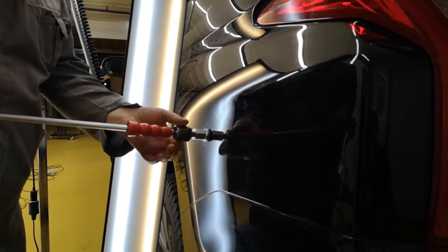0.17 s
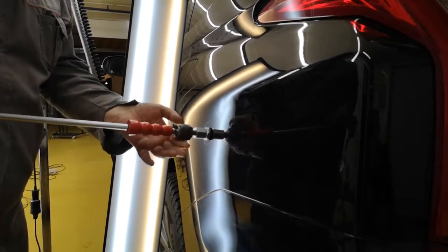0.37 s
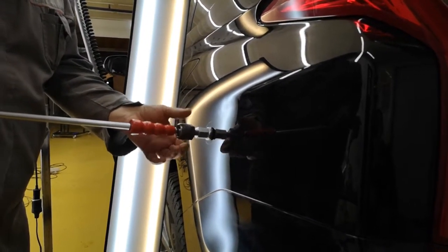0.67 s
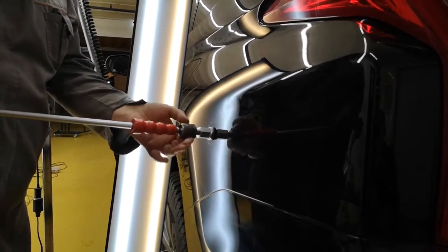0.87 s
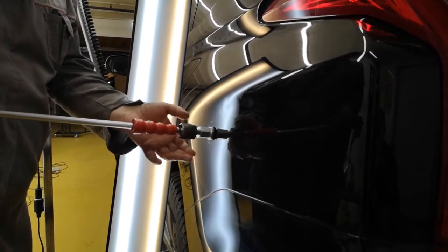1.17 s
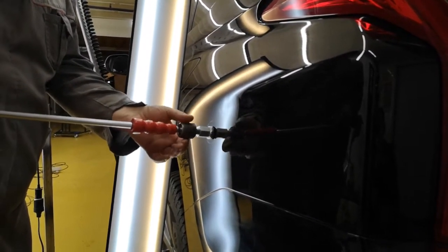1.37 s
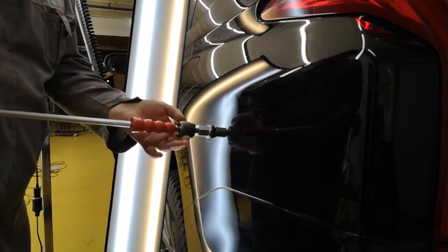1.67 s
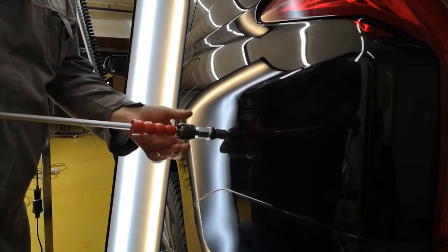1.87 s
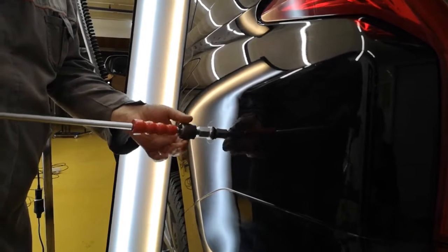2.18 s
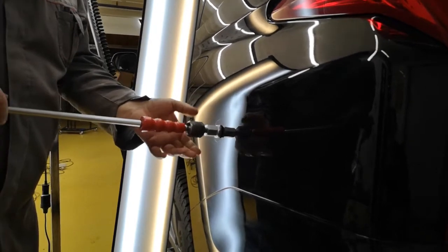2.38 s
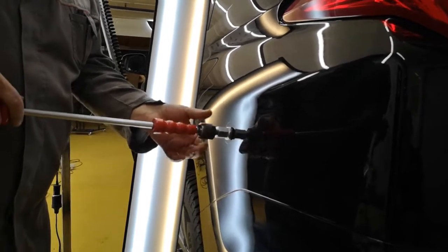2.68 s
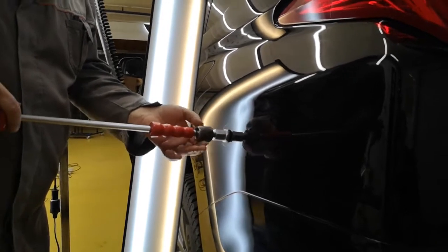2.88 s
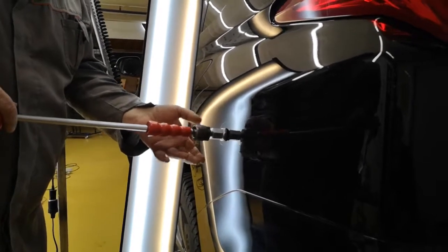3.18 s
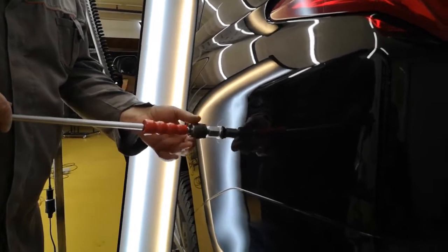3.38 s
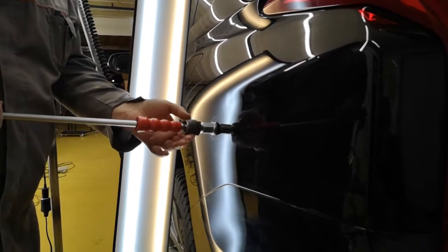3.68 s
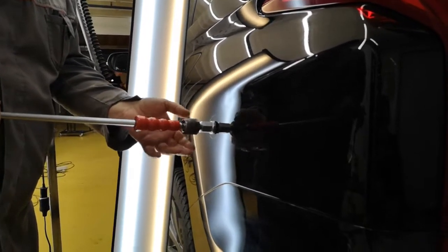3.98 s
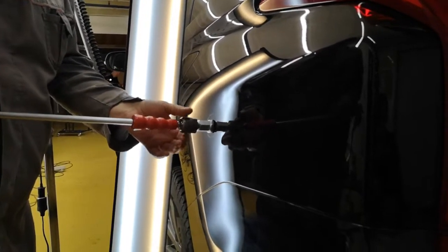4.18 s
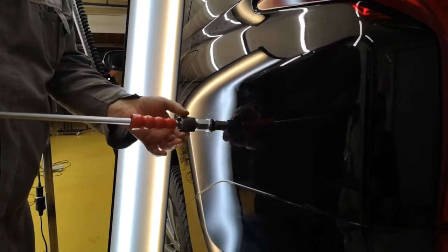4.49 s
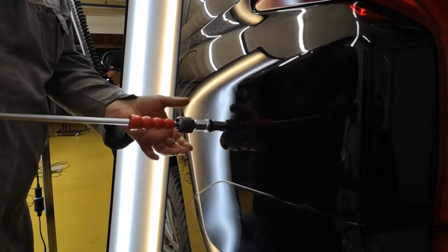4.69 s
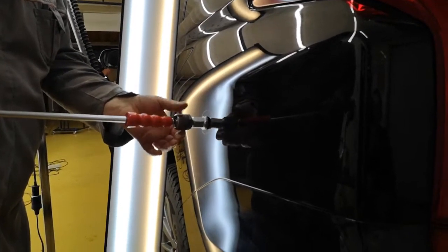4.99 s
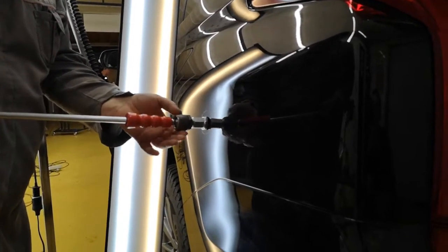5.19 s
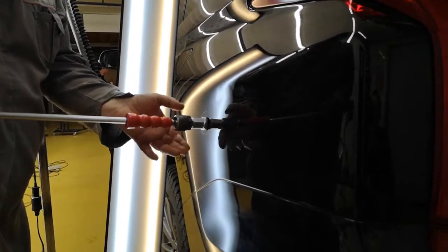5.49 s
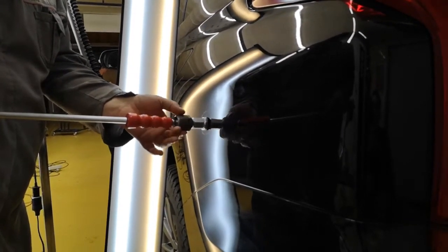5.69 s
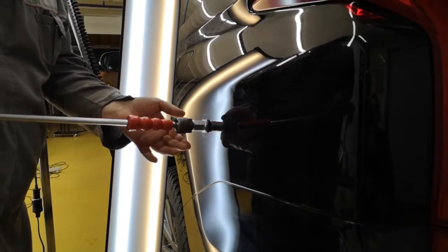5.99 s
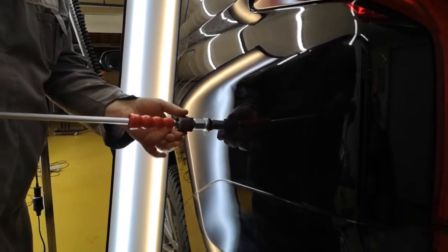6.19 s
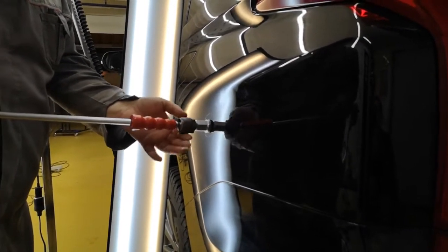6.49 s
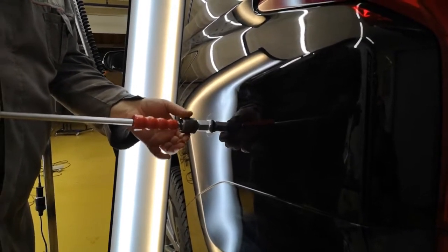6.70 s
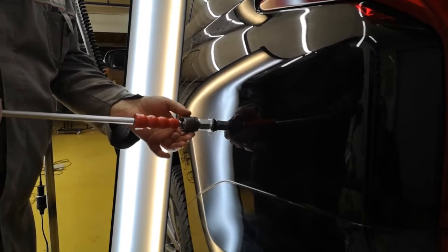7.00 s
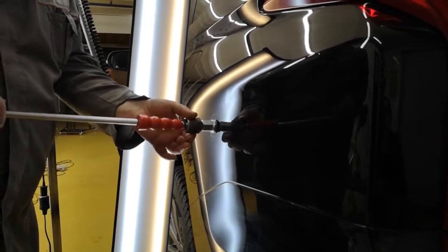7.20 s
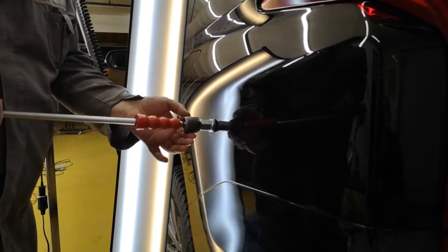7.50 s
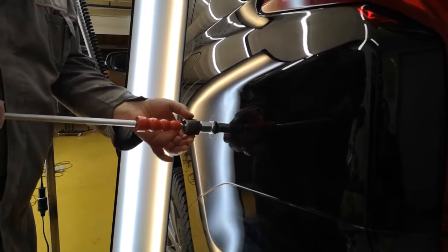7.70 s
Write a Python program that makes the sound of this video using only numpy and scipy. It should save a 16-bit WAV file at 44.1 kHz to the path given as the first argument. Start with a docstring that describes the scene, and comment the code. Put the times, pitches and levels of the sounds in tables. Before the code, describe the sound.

Sharp, booming metal knocks of a slide hammer pulling a car panel in a workshop, then quick light clinking taps.

```python
"""A slide hammer slams against a tab glued to a car body panel, which booms in an echoing workshop. Between
these hard pulls the weight glides along its rod to a soft front stop, and the hand bumps the tool. Each impact
excites the damped modes of panel and rod; sliding friction gives a faint rubbing and hiss. After a stick-slip
squeak comes a run of quick light taps in which the steel rod clinks. Room tone and a deep rumble that swells
after each stroke lie underneath; a noise suppressor shortens the echoes."""
import sys
import numpy as np
from scipy import signal
from scipy.fft import rfft, irfft
from scipy.io import wavfile
from scipy.ndimage import uniform_filter1d

SR = 44100
rng = np.random.default_rng(int(sys.argv[2]) if len(sys.argv) > 2 else 0)


def file_out(sig):
    """Save sig as 16-bit WAV at sys.argv[1]."""
    # one column per channel
    cols = np.atleast_2d(sig).T
    # limit, then scale
    lim = np.clip(cols, -1, 1)
    pcm = np.round(lim * 32767).astype(np.int16)
    wavfile.write(sys.argv[1], SR, pcm)


N = 345744

# impacts at the rear and the front stop: (time [s], relative level [dB], spectral tilt [dB/octave])
HARD_PULLS = [(-.25, -20, 0.89), (.722, -19, 0.9), (2.512, -19, 0.85), (3.478, -23.5, 0.58),
              (4.440, -20.5, 0.55), (5.813, -19, .5)]
SOFT_STOPS = [(.395, -33, 0), (2.155, -40, -2.5), (3.137, -36.5, -2), (4.117, -37.5, -1.25),
              (5.480, -43.5, -2.5)]
# light taps: (time [s], relative level [dB], grip [0 frees the rod's lower modes, 1 its upper modes])
LIGHT_TAPS = [(5.536, -35.5, 0.36), (5.785, -32, .18), (6.027, -27, 0.16), (6.268, -26, 0.19),
              (6.498, -26, 0.51), (6.744, -26, 0.94), (6.993, -26.5, 0.93), (7.248, -27.4, 0.63),
              (7.496, -27.6, 0.68), (7.744, -27, 1)]
# bumps of the hand on the tool: (time [s], relative level [dB])
HAND_BUMPS = [(0.211, -55), (1.391, -59), (1.448, -48.5), (1.908, -48.5), (2.301, -49), (2.98, -54.5),
              (3.079, -51.5), (3.44, -56.5), (4.18, -42.5), (4.89, -54.5)]


def gain_of(db):
    """A level in decibels is an amplitude ratio on a logarithmic scale."""
    return 10 ** (np.asarray(db) / 20)


def unit_rms(x):
    """Normalisation to a mean power of one."""
    return x / np.sqrt(np.mean(x ** 2) + 1e-20)


def curve_at(points, hz):
    """Interpolation of (frequency [Hz], value) points on a logarithmic frequency axis."""
    f, value = np.transpose(points)
    return np.interp(np.log(hz + 1), np.log(f + 1), value)


def add(mix, time_s, sound):
    """Superposition: a sound joins the mix at a time that may lie before the start."""
    start = round(time_s * SR)
    sound = sound[:, max(-start, 0):]
    part = mix[:, max(start, 0):][:, :sound.shape[1]]
    part += sound[:, :part.shape[1]]


def swell(middle_s, length_s):
    """A Gaussian envelope, its length taken between the 1/e points."""
    return np.exp(-(2 * (np.arange(N) / SR - middle_s) / length_s) ** 2)


def coloured(noise, spectrum):
    """Linear filtering gives steady noise a spectrum, here at an rms of one."""
    return unit_rms(irfft(rfft(noise) * gain_of(curve_at(spectrum, np.fft.rfftfreq(N, 1 / SR))), N))


def noise_pair(size):
    """Spatial coherence: noise at two spaced microphones is alike in the bass, less so above."""
    # likeness of left and right: (frequency [Hz], coherence [0..1])
    coherence = [(100, 1), (190, .98), (330, .8), (650, .65), (1400, .35), (3000, .25), (12000, .2)]
    # lead of the left side: (frequency [Hz], phase [rad])
    phase_lead = [(120, 0), (200, .35), (350, .95), (650, 2.9), (1500, 6.2), (4000, 15.5)]
    hz = np.fft.rfftfreq(size, 1 / SR)
    left, independent = rfft(rng.standard_normal((2, size)))
    shared = np.clip(curve_at(coherence, hz), 0, 1)
    right = (shared * left + np.sqrt(1 - shared ** 2) * independent) * np.exp(-1j * curve_at(phase_lead, hz))
    return irfft(np.array([left, right]), size)


def modal_response(spectrum, modes=(), tilt_db=0, size=16384):
    """Resonance: modal peaks on a broad spectrum give a minimum-phase impulse response of unit energy."""
    hz = np.fft.rfftfreq(size, 1 / SR)
    db = curve_at(spectrum, hz) + tilt_db * np.log2(hz / 1000 + .1)
    db += sum(lift / (1 + (2 * (hz - f) / width) ** 2) for f, width, lift in modes)
    cepstrum = irfft(np.log(gain_of(db)))[:size // 2]
    cepstrum[1:] *= 2  # folded onto positive times, so that nothing sounds before the blow
    response = irfft(np.exp(rfft(cepstrum, size)))[:size // 2]
    return response / np.linalg.norm(response)


def strike(response, chatter_db=-6, chatter_s=0.009, size=2048):
    """Impact excitation: an impulse and a decaying chatter of steel on steel drive a resonator."""
    chatter = rng.standard_normal(size) * np.exp(-np.arange(size) / SR / chatter_s)
    force = signal.lfilter(*signal.butter(2, 700, "high", fs=SR), chatter)
    force *= gain_of(chatter_db) / np.linalg.norm(force)
    force[0] += 1
    return signal.fftconvolve(force / np.linalg.norm(force), response)


def workshop(size=30870, late_share=0.76, onset_s=0.0039, end_s=0.44):
    """Reverberation: dense reflections build up, then decay exponentially, each band at its own rate."""
    # echo bands: (frequency [Hz], reverberation time [s], build-up time [s])
    bands = [(81, 0.69, 0.033), (252, 0.65, 0.045), (892, 0.72, 0.034), (2570, 0.48, 0.033),
             (4900, 0.7, 0.017), (8650, 0.49, 0.022), (14100, 0.6, 0.009)]
    # balance of the echo: (frequency [Hz], left over right [dB])
    balance = [(130, 0), (350, 0), (700, 3), (1400, 1), (3000, -0.6), (6000, 3.5), (12000, 0)]
    t, hz = np.arange(size) / SR, np.fft.rfftfreq(size, 1 / SR)
    frames = signal.stft(noise_pair(size), nperseg=2048, noverlap=1536)[2]
    power = uniform_filter1d((abs(frames) ** 2).mean(0), size=3, axis=1)
    frames /= np.sqrt(abs(power) + 1e-12)  # a diffuse field favours no band and no moment
    echoes = unit_rms(signal.istft(frames, nperseg=2048, noverlap=1536)[1][:, :size])
    spectrum = rfft(echoes) * gain_of(curve_at(balance, hz) * np.array([[.5], [-.5]]))
    out = np.zeros((2, size))
    for selector, (_, t60, rise_s) in zip(np.eye(len(bands)), bands):
        band = curve_at(np.c_[np.array(bands)[:, 0], selector], hz)
        build_up = (1 - np.exp(-t / onset_s)) * (1 - late_share * np.exp(-t / rise_s))
        envelope = build_up * gain_of(-60 * t / t60)
        out += irfft(spectrum * band, size) * envelope / envelope.max()
    return out * np.exp(-(t / end_s) ** 7)  # the last of the tail falls away faster


def early_reflections(room, fade_s):
    """The shortest paths arrive first: an exponential window keeps only these."""
    return room * np.exp(-np.arange(room.shape[1]) / SR / fade_s)


def in_room(sound, room):
    """Convolution with the room's impulse response carries a sound to both microphones."""
    return signal.fftconvolve(sound[None], room, axes=1)


def ambience(tone_db=-58, calm_db=-60):
    """Ambient noise: room tone over a deep rumble that swells after each stroke; the swells add in power."""
    # spectra of the room tone and the rumble: (frequency [Hz], relative level [dB])
    tone_spectrum = [(8.8, -32), (15, -16.5), (35, -6), (54, -34.5), (96, -17.5), (118, -19.5), (475, -30),
                     (927, -28.5), (1010, -31), (1390, -34.5), (2280, -33.5), (8670, -46.5), (15500, -55)]
    rumble_spectrum = [(5, -10.5), (18, -2.5), (32, -7.5), (55, -25), (120, -35), (400, -93)]
    # (strokes, delay [s], length [s], level against the stroke [dB])
    rumble_rises = [(HARD_PULLS, 0.16, 0.3, -28.5), (SOFT_STOPS, 0.13, 0.26, -13.5),
                    (LIGHT_TAPS, 0.15, 0.36, -20), (HAND_BUMPS, 0.03, 0.15, -2.2)]
    power = gain_of(calm_db) ** 2
    for strokes, delay_s, length_s, rise_db in rumble_rises:
        for time_s, db, *_ in strokes:
            power += (gain_of(db + rise_db) * swell(time_s + delay_s, length_s)) ** 2
    rumble = np.sqrt(power) * coloured(rng.standard_normal(N), rumble_spectrum)
    return gain_of(tone_db) * coloured(noise_pair(N), tone_spectrum) + rumble


def hand_bumps(room, boost_db=6):
    """A soft contact excites mainly low frequencies: the hand nudges the tool with a short, dull bump."""
    # one bump: (frequency [Hz], relative level [dB])
    spectrum = [(50, -28), (110, -5.5), (165, -2.5), (260, -7), (450, -21.5), (1000, -18.5), (3000, -32),
                (9000, -45), (14000, -64)]
    bump = in_room(modal_response(spectrum), early_reflections(room, fade_s=0.04))
    out = np.zeros((2, N))
    for time_s, db in HAND_BUMPS:
        add(out, time_s, gain_of(db + boost_db) * bump)
    return out


def glides(usual_rub_db=-62.5, hiss_db=-64, hiss_growth=0.25):
    """Sliding friction makes broadband noise, with a thin hiss that changes little with the pressure."""
    # the weight moving along the rod: (middle time [s], length [s], rubbing level [dB])
    moves = [(0.235, 0.072, -58), (0.673, 0.055, -76), (1.238, 0.12, -58), (1.476, 0.17, -66),
             (1.874, 0.18, -61), (2.36, 0.19, -50), (3.076, 0.13, -73), (3.915, 0.099, -60.5),
             (4.314, 0.18, -60), (5.41, 0.09, -67)]
    # friction spectra: (frequency [Hz], relative level [dB])
    rub_spectrum = [(200, -9.5), (1000, 0.5), (2500, 1.5), (5000, -0.5), (8000, 0), (10000, -14),
                    (15000, -23.5)]
    hiss_spectrum = [(3000, -27), (6300, -19), (7500, 7), (8300, -10), (9500, -24), (14000, -39)]
    rub, hiss = coloured(noise_pair(N), rub_spectrum), coloured(noise_pair(N), hiss_spectrum)
    out = np.zeros((2, N))
    for middle_s, length_s, db in moves:
        hiss_gain = gain_of(hiss_db + hiss_growth * (db - usual_rub_db))
        out += swell(middle_s, length_s) * (gain_of(db) * rub + hiss_gain * hiss)
    return out


def squeaks(room, overtone_db=-12, echo_db=1, settle_s=0.0074, jitter=0.043, jitter_s=0.00069):
    """Stick-slip oscillation of steel on steel: three harmonics whose unsteady pitch drops and settles."""
    # (time [s], length [s], final pitch [Hz], pitch drop [Hz], relative level [dB])
    chirps = [(3.883, 0.025, 4000, 100, -60), (5.369, 0.023, 2640, 860, -36.5)]
    paths = early_reflections(room, fade_s=0.049)
    paths *= gain_of(echo_db) / np.linalg.norm(paths[0])
    paths[:, 0] += 1  # the direct path
    pan_right = gain_of([[-2], [2]])
    out = np.zeros((2, N))
    for time_s, length_s, end_hz, drop_hz, db in chirps:
        t = np.arange(0, length_s, 1 / SR)
        waver = signal.lfilter([1], [1, -np.exp(-1 / (jitter_s * SR))], rng.standard_normal(SR // 10))
        pitch_hz = (end_hz + drop_hz * np.exp(-t / settle_s)) * (1 + jitter * unit_rms(waver)[:len(t)])
        phase = 2 * np.pi * np.cumsum(pitch_hz) / SR
        tone = sum(gain_of(overtone_db * k) * np.sin((k + 1) * phase) for k in range(3))
        add(out, time_s, pan_right * in_room(gain_of(db) * np.hanning(len(t)) * tone, paths))
    return out


def knocks(strokes, spectrum, panel_modes, room, clack_db, clack_slope, rod_db, rod_slope, **chatter):
    """Structure-borne sound: the tab passes each jolt to the panel; brighter blows ring the rod more."""
    out = np.zeros((2, N))
    for time_s, db, tilt_db in strokes:
        # (frequency [Hz], width [Hz], lift [dB])
        tab_clack = (2060, 1130, clack_db + clack_slope * tilt_db)
        rod_ring = (5150, 840, rod_db + rod_slope * tilt_db)
        response = modal_response(spectrum, panel_modes + [tab_clack, rod_ring], tilt_db)
        add(out, time_s, gain_of(db) * in_room(strike(response, **chatter), room))
    return out


def soft_stops(room):
    """A slow collision: the weight meets its front stop, chatters and excites the panel weakly."""
    # the knock: (frequency [Hz], relative level [dB])
    spectrum = [(60, -18), (150, -13), (270, -2), (430, -3.5), (600, -5.5), (1000, -7.5), (1500, -10.5),
                (2600, -13), (3500, -16), (6000, -27), (8500, -28.5), (11000, -56)]
    # panel resonances: (frequency [Hz], width [Hz], lift [dB])
    panel_modes = [(251, 33, 1.2), (455, 75, 5), (903, 380, 6.7), (1080, 74, 3.4), (2500, 590, 4.4)]
    return knocks(SOFT_STOPS, spectrum, panel_modes, room, chatter_db=1.5, chatter_s=0.05,
                  clack_db=0, clack_slope=-2, rod_db=3.5, rod_slope=4.5)


def light_taps(room, usual_tap_db=-26.5, clink_db=-26.5, clink_growth=1.6, rebound_s=0.011, rebound_db=10):
    """Selective damping: the panel thuds and the rod clinks in those modes that the grip leaves free."""
    # panel thud and rod clink: (frequency [Hz], relative level [dB])
    thud_spectrum = [(50, -25), (100, -8), (140, -10), (180, -5), (280, -9), (560, -8), (680, -5.5),
                     (1000, -16), (1600, -16), (2500, -7.5), (3500, -25), (5000, -59), (10000, -53)]
    clink_spectrum = [(1500, -37.5), (3000, -11), (4500, -9.5), (5100, -4), (6100, -7.5), (6600, -6),
                      (8000, -13), (9200, -19), (10000, -32.5), (12500, -34), (15000, -67)]
    # resonances: (frequency [Hz], width [Hz], lift [dB])
    panel_modes = [(168.6, 20, 6.4), (186.6, 35, 6.4), (247, 51, 10.1), (353.8, 19, 14), (443, 7.7, 12),
                   (493, 30, 7.7), (554, 41, 12.6), (593, 6.2, 5.2), (988, 98, 9.4), (1369, 25, 8.6)]
    lower_rod_modes = [(4964, 260, 14.8), (5430, 780, 7.2)]
    upper_rod_modes = [(5814, 130, 7.9), (5995, 236, 16.3), (6500, 94, 1), (7087, 270, 14),
                       (7940, 360, 7.7)]
    out, short_room = np.zeros((2, N)), early_reflections(room, fade_s=0.013)
    for time_s, db, grip in LIGHT_TAPS:
        thud = gain_of(db) * strike(modal_response(thud_spectrum, panel_modes))
        force_db = db - usual_tap_db
        lower = [(f, width, lift * (1 - 0.87 * grip)) for f, width, lift in lower_rod_modes]
        upper = [(f, width, lift * (0.25 + 0.75 * grip)) for f, width, lift in upper_rod_modes]
        zing = (10330, 680, 16.5 - 24.5 * grip + 1.8 * force_db)  # the bright edge of steel on steel
        rod = modal_response(clink_spectrum, lower + upper + [zing])
        clink = gain_of(clink_db + clink_growth * force_db) * strike(rod)
        add(out, time_s, in_room(thud + clink, room))
        # the weight rebounds and clinks on the rod again, just after the tap
        add(out, time_s + rebound_s, gain_of(rebound_db) * in_room(clink, short_room))
    return out


def hard_pulls(room):
    """Momentum transfer: the weight slams into its rear stop, and the panel booms in its bending modes."""
    # the boom: (frequency [Hz], relative level [dB])
    spectrum = [(40, -24), (64, -7.5), (140, -7), (230, -0.5), (340, -0.5), (620, -2.5), (900, -4.5),
                (1700, -12.5), (2800, -14.5), (4000, -10), (8500, -18.5), (9500, -25), (10500, -40.5),
                (15000, -49)]
    # panel resonances: (frequency [Hz], width [Hz], lift [dB])
    panel_modes = [(68.9, 9.5, 11), (108.2, 11, 10.5), (166.2, 14, 7), (214, 39, 6.5), (279.7, 13.6, 9),
                   (358.3, 25, 4.5), (434, 14, 4.5), (832, 340, 5.5), (1084, 33, 9), (1397, 85, 6),
                   (2657, 330, 9.5), (3460, 88, 9)]
    return knocks(HARD_PULLS, spectrum, panel_modes, room, chatter_db=-6, chatter_s=0.011,
                  clack_db=8.5, clack_slope=-0.75, rod_db=-8, rod_slope=12.2)


def scene():
    """Superposition: the pressures of all sources add in one room, at one pair of microphones."""
    room = workshop()
    impacts = hard_pulls(room) + soft_stops(room) + light_taps(room) + hand_bumps(room)
    return impacts + glides() + squeaks(room) + ambience()


def record(dry, knee_db=3.5, depth_db=7, bass_hz=160, cutoff_hz=15500):
    """Spectral gating turns quiet bands above the bass down, shortening the tails; a low-pass follows."""
    # where the noise suppressor is half shut: (frequency [Hz], level per bin [dB])
    threshold = [(200, -69), (1000, -65), (3000, -76), (6000, -90), (12000, -94)]
    hz, _, frames = signal.stft(dry, SR, nperseg=1024, noverlap=768)
    power = uniform_filter1d((abs(frames) ** 2).mean(0), size=15, axis=0)  # smoothed over frequency
    power = uniform_filter1d(power, size=5, axis=1)  # and over time
    excess_db = 10 * np.log10(abs(power) + 1e-16) - curve_at(threshold, hz)[:, None]
    above_bass = hz ** 2 / (hz ** 2 + bass_hz ** 2)
    shut = (.5 - .5 * np.tanh(excess_db / (2 * knee_db))) * above_bass[:, None]
    gated = signal.istft(frames * gain_of(-depth_db * shut), SR, nperseg=1024, noverlap=768)[1][:, :N]
    low_pass = signal.firwin(511, cutoff_hz, window=("kaiser", 9), fs=SR)
    return signal.oaconvolve(gated, low_pass[None], "same")


dry = scene()
out = record(dry)
file_out(out)
```